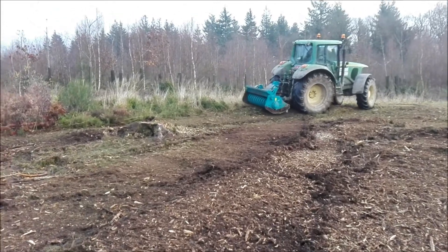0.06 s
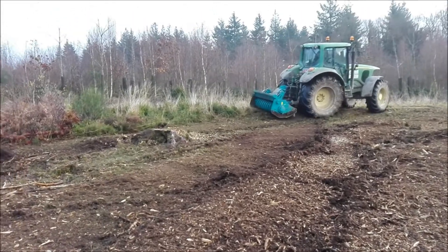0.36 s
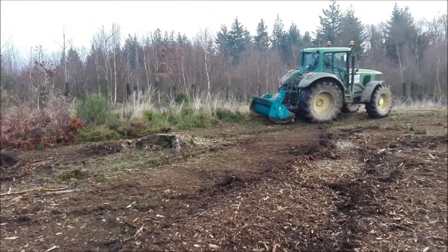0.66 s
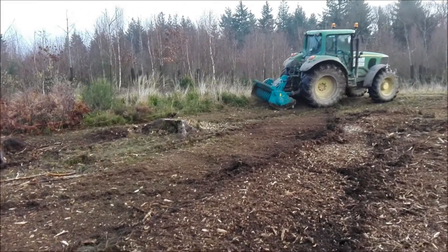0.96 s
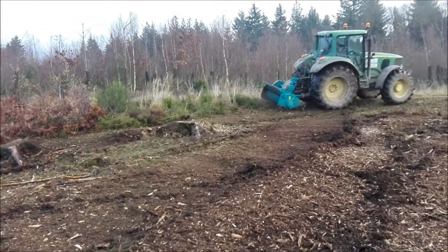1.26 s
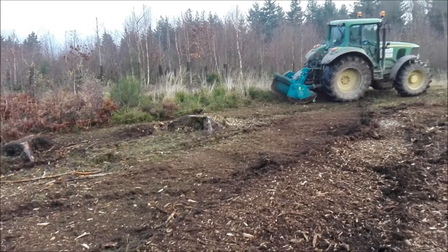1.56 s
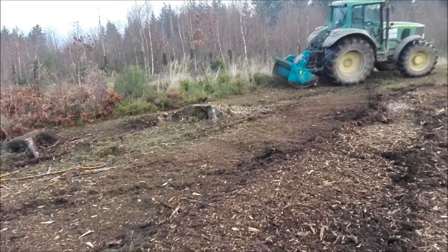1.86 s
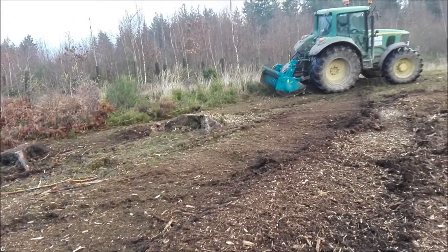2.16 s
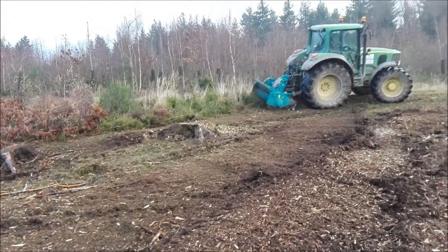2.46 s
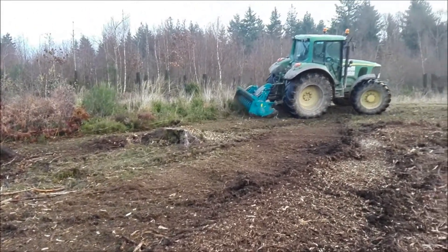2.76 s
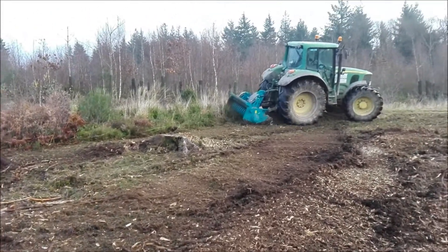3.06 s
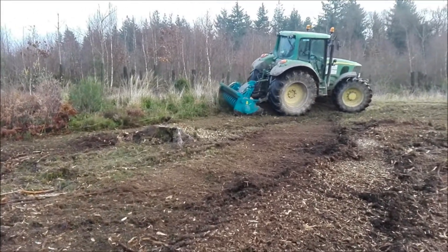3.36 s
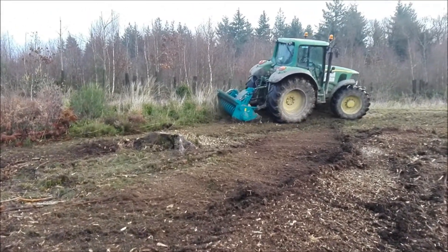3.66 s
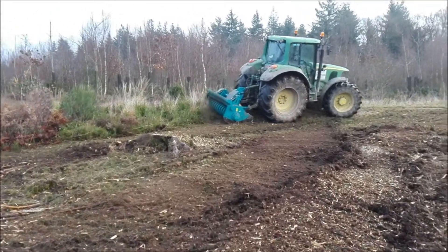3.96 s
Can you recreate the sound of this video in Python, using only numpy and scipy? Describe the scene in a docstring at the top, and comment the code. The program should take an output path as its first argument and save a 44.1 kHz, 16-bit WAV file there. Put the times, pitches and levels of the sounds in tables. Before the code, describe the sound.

A tractor driving a mulcher drones and clatters throughout, some way off in an open field. In the first second, gusts thump the microphone and dry twigs snap. From 1 second, wood is shredded, with chips rattling on steel and hard cracks. The grinding eases near 1.7 seconds and resumes at 2.5. A faint gear whine rises from 3 seconds, a stone clinks near 3.5, and two weaker gusts follow.

```python
"""A tractor drives a forestry mulcher over stumps and brush, some way off in an open field.
The drive drones and the diesel clatters throughout. Gusts thump the microphone; dry twigs snap.
From 1 s the rotor's teeth shred wood: chips rattle in the steel hood, thick pieces crack harder.
Near 2.5 s the hood turns side-on and the grinding picks up again; gear whine rises from 3 s.
Near 3.5 s a stone clinks on steel, then two weaker gusts follow."""
import sys
import numpy as np
from scipy import signal
from scipy.fft import rfft, irfft, next_fast_len
from scipy.io import wavfile
from scipy.ndimage import uniform_filter1d, map_coordinates

SR = 44100
rng = np.random.default_rng(int(sys.argv[2]) if len(sys.argv) > 2 else 0)


def materialize(psi):
    """Save the field psi as 16-bit PCM at rate SR to the path in sys.argv[1].

    A 1-D psi becomes a single channel; in a 2-D psi each row is a channel.
    """
    bounded = np.clip(np.atleast_2d(psi).T, -1, 1)
    quanta = np.round(bounded * 32767).astype(np.int16)
    wavfile.write(sys.argv[1], SR, quanta)


N = 176400

# drive speed, sagging under load (time [s], speed [Hz])
SHAFT_HZ = [(0, 78.2), (1.15, 77.6), (1.75, 75), (2.3, 79.8), (2.95, 76.3), (3.35, 76.1), (3.58, 77.5)]
# strong drone orders (time [s], order 1 [dB], order 2 [dB], order 3 [dB])
DRONE_DB = [(0, -29, -32, -36), (1.05, -27, -30, -33.5), (1.3, -36, -26, -42), (1.72, -40, -27.5, -52),
            (2.05, -30, -38.5, -44.5), (2.7, -37, -24, -45.5), (2.9, -42, -26, -36),
            (3.3, -31, -25.5, -44.5), (3.52, -34.5, -40, -46)]
# weak drone orders (order [x shaft], level [dB re order 2])
WEAK_ORDERS = [(1.3, -6.5), (4, -18.5), (4.6, -22)]
# gear tones (order [x shaft], level [dB])
GEAR_ORDERS = [(9.21, -46.5), (13.82, -41.5), (19.1, -48.5)]
# gear whine swell (time [s], gain [dB])
WHINE_GAIN_DB = [(3.0, -7), (3.55, 2)]
# machine roar (time [s], level [dB])
RUMBLE_DB = [(.3, -21.5), (.9, -24), (1.8, -29.5), (2.4, -25.5), (3.4, -26.5), (3.9, -28.5)]
# roar spectrum (frequency [Hz], gain [dB])
RUMBLE_EQ = [(25, -6), (60, -2.5), (100, 1), (135, -4.5), (190, -6.5), (270, -15.5), (480, -28),
             (900, -56.5)]
# engine casing response (frequency [Hz], gain [dB])
CASING_EQ = [(520, -17), (720, -3.5), (1050, -0.5), (1650, -1), (1900, 1), (2250, -15.5), (5000, -12.5),
             (12000, -49)]
# gusts (time [s], level [dB])
GUST_PEAKS = [(.05, -19), (.175, -16.5), (.25, -21), (.308, -17), (.42, -19), (.528, -21), (.665, -22),
              (.94, -21), (3.585, -25), (3.68, -26)]
# wind spectrum (frequency [Hz], gain [dB])
WIND_EQ = [(20, -5), (100, 2), (240, -8.5), (400, -21), (700, -50.5)]
# chip bunching per tooth pass (time [s], depth [Np])
BUNCHING_NP = [(.95, 0.34), (1.35, 0.25), (1.8, 0.44), (2.4, 0.067), (3.8, 0.31)]
# brush under the rotor (time [s], level [dB])
CRACKLE_DB = [(.45, -42), (.75, -34), (1.45, -29), (1.75, -38.5), (2.4, -41.5), (2.75, -43)]
# twigs breaking (time [s], level [dB])
TWIG_SNAPS = [(0.532, -24), (.583, -19.5), (.741, -20), (0.932, -22)]
# brush spectrum (frequency [Hz], gain [dB])
BRUSH_EQ = [(700, -17.5), (3000, 0.5), (5500, 8.5), (8000, -7)]
# grinding effort (time [s], relative level [dB])
GRIND_DB = [(.45, -36.5), (.9, -31), (1.1, -25), (1.24, -18.5), (1.35, -23), (1.5, -25.5), (1.6, -21),
            (1.73, -34.5), (2.46, -34.5), (2.58, -25), (2.85, -23), (3.1, -26.5), (3.52, -27), (3.65, -29)]
# teeth biting wood, and short chip knocks on the hood (time [s], hood level [dB], wood level [dB], T60 [s])
TOOTH_BITES = [(1.034, -24, -16, 0.08), (1.135, -10.5, -22, .12), (1.1508, -13, -15, 0.075),
               (1.164, -5.5, -12.5, 0.14), (1.2, -21, -13.5, 0.041), (1.297, -7, -17.5, 0.12),
               (1.385, -17, -22, 0.13), (1.8163, -19.5, -36, 0.027), (1.9065, -19.5, -40, .1),
               (1.9347, -23, -23, 0.036), (2.0277, -20.5, -36, 0.026), (2.0635, -16, -31, 0.052),
               (2.075, -20.5, -40, 0.13), (2.1927, -24.5, -24, .05), (2.5795, -23, -23.5, 0.057),
               (2.6944, -21.5, -15, 0.025), (2.981, -14.5, -38, 0.11), (3.2804, -21, -27, 0.087)]
# hood response from behind (frequency [Hz], gain [dB])
HOOD_REAR_EQ = [(1700, -46.5), (2600, -13), (3100, -11.5), (3950, 0.5), (5100, 0.5), (5950, -2),
                (6950, -24), (7550, -7.5), (8900, -17.5), (9900, -16), (10400, -26)]
# wood response (frequency [Hz], gain [dB])
WOOD_EQ = [(250, -14.5), (550, -25.5), (900, -8), (1400, -6.5), (1860, 2.5), (2200, -12.5), (3200, -23.5),
           (8000, -73)]
# tractor's turn (time [s], hood power heard side-on [0..1])
SIDE_SHARE = [(2.3, 0.017), (2.6, 0.97)]
# hood response from the side (frequency [Hz], gain [dB])
HOOD_SIDE_EQ = [(1700, -26), (2650, -6), (3400, -16), (3750, -2.5), (4300, -7), (5000, 0.5), (5900, -2),
                (7000, -15.5), (8300, -18), (13500, -29.5)]
# stone on steel (time [s], level [dB])
STONE_HITS = [(3.456, -12.5)]
# steel modes (frequency [Hz], relative level [dB])
STEEL_MODES = [(5141, 3.6), (5523, 3), (5798, 8)]


def amp(db):
    """Decibels to gain."""
    return 10 ** (np.asarray(db) / 20)


def unit(x):
    """Scale to rms 1."""
    return x / np.sqrt(np.mean(x ** 2) + 1e-20)


def curve(rows, column=1):
    """Table column, interpolated per sample."""
    rows = np.asarray(rows)
    return np.interp(np.arange(N) / SR, rows[:, 0], rows[:, column])


def wobble(rate_hz):
    """Smooth random curve, knots at rate_hz."""
    return map_coordinates(rng.standard_normal(4000), [np.arange(N) * rate_hz / SR], mode="wrap")


def coloured(x, eq, ripple_db=0):
    """Causal body of unit power gain, rippled by many small resonances."""
    size = 2 * next_fast_len(N)
    hz = np.fft.rfftfreq(size, 1 / SR)
    eq_hz, eq_db = np.transpose(eq)
    ripple = map_coordinates(rng.standard_normal(600), [hz / 55], mode="wrap")
    gain = amp(np.interp(np.log(hz + 1), np.log(eq_hz), eq_db) + ripple_db * ripple)
    cepstrum = irfft(np.log(unit(gain)))
    cepstrum[1:size // 2] *= 2  # fold to minimum phase
    cepstrum[size // 2 + 1:] = 0
    return irfft(rfft(x, size) * np.exp(rfft(cepstrum)), size)[:N]


def burst(start_s, t60_s, attack_s):
    """Impact envelope: fast rise, exponential decay."""
    age_s = np.maximum(np.arange(N) / SR - start_s, 0)
    return (1 - np.exp(-age_s / attack_s)) * np.exp(-np.log(1000) * np.minimum(age_s / t60_s, 10))


def drone(phase, flutter_db=0.5):
    """Low orders of the drive, each fluttering slightly."""
    orders = [(order, curve(DRONE_DB, column=order)) for order in (1, 2, 3)]
    orders += [(order, db + curve(DRONE_DB, column=2)) for order, db in WEAK_ORDERS]
    tones = np.zeros(N)
    for order, db in orders:
        peak = np.sqrt(2) * amp(db + flutter_db * wobble(13))
        tones += peak * np.sin(order * phase + rng.uniform(0, 2 * np.pi))
    return tones


def whine(phase):
    """Gear tones; they come forward once the tractor has turned."""
    tones = sum(amp(db) * np.sin(order * phase) for order, db in GEAR_ORDERS)
    return np.sqrt(2) * amp(curve(WHINE_GAIN_DB)) * tones


def rumble():
    """Dull roar of the machine."""
    return amp(curve(RUMBLE_DB)) * unit(coloured(rng.standard_normal(N), RUMBLE_EQ))


def clatter(phase, level_db=-31, depth_np=0.16):
    """Diesel knock pulsing in the engine casing."""
    knocks = unit(rng.standard_normal(N) * np.exp(depth_np * np.cos(phase)))
    return amp(level_db) * coloured(knocks, CASING_EQ, ripple_db=1)


def gusts(sigma_s=0.019):
    """Short swells of wind buffet the microphone."""
    t = np.arange(N) / SR
    swells = sum(amp(db) * np.exp(-0.5 * ((t - peak_s) / sigma_s) ** 2) for peak_s, db in GUST_PEAKS)
    return swells * coloured(rng.standard_normal(N), WIND_EQ)


def patchy(x, depth_db=2.0):
    """The colour keeps shifting as chips of different sizes fly."""
    spectra = signal.stft(x, nperseg=512)[2]
    patches = rng.standard_normal(spectra.shape)
    for _ in range(2):
        patches = uniform_filter1d(patches, size=4, axis=0)  # frequency
        patches = uniform_filter1d(patches, size=7, axis=1)  # time
    gain = unit(amp(depth_db * unit(patches)))
    return signal.istft(spectra * gain, nperseg=512)[1][:N]


def chips(phase, rate_hz, dust_gain, clump_db, spread_db=5.5):
    """Small random impacts over a hiss of dust, bunched at each tooth pass."""
    hits = (rng.random(N) < rate_hz / SR) * rng.choice([-1, 1], N)
    strengths = amp(spread_db * np.clip(rng.standard_normal(N), -2, 2))
    stream = unit(hits * strengths) + dust_gain * rng.standard_normal(N)
    tooth_passes = np.exp(curve(BUNCHING_NP) * np.cos(phase))
    clumps = amp(clump_db * wobble(260))
    return unit(patchy(stream * tooth_passes * clumps))


def brush(phase):
    """Dry twigs crackle and snap under the rotor."""
    crackle = amp(curve(CRACKLE_DB)) * chips(phase, rate_hz=1200, dust_gain=1.0, clump_db=2.5)
    snaps = sum(amp(db) * burst(start_s, t60_s=0.025, attack_s=0.00026) for start_s, db in TWIG_SNAPS)
    return coloured(crackle + snaps * rng.standard_normal(N), BRUSH_EQ)


def mulcher(phase, hood_trim_db=-1, wood_trim_db=-7.5, wood_db_per_db=1.67):
    """Chips and bites excite both the steel hood and the wood."""
    grind_db = curve(GRIND_DB)
    mean_db = grind_db.mean()
    hood_db = grind_db + hood_trim_db
    wood_db = mean_db + wood_db_per_db * (grind_db - mean_db) + wood_trim_db
    on_hood = amp(hood_db) * chips(phase, rate_hz=3500, dust_gain=1.35, clump_db=1.67)
    in_wood = amp(wood_db) * chips(phase, rate_hz=2000, dust_gain=0.65, clump_db=2.5)
    splinters = unit(rng.standard_normal(N) * amp(0.25 * wobble(500)))
    for start_s, bite_hood_db, bite_wood_db, t60_s in TOOTH_BITES:
        attack_s = t60_s ** 2 / 10  # thick pieces give way more slowly
        bite = burst(start_s, t60_s, attack_s) * splinters
        on_hood += amp(bite_hood_db) * bite
        in_wood += amp(bite_wood_db) * bite
    side_share = curve(SIDE_SHARE)
    rear = coloured(np.sqrt(1 - side_share) * on_hood, HOOD_REAR_EQ, ripple_db=1.2)
    side = coloured(np.sqrt(side_share) * on_hood, HOOD_SIDE_EQ, ripple_db=1)
    return rear + side + coloured(in_wood, WOOD_EQ, ripple_db=0.5)


def stone_clink(t60_s=0.14, jitter_rad=2.0):
    """A stone rings the steel briefly and roughly."""
    t = np.arange(N) / SR
    ring = sum(amp(db) * np.sin(2 * np.pi * hz * t + jitter_rad * wobble(400)) for hz, db in STEEL_MODES)
    envelope = sum(amp(db) * burst(start_s, t60_s, attack_s=0.00071) for start_s, db in STONE_HITS)
    return unit(ring) * envelope


def forest_echo(x, t60_s=1.0, echo_db=-13, rise_s=0.018):
    """Direct sound plus faint scatter from the forest edge."""
    t = np.arange(SR) / SR
    tail = rng.standard_normal(SR) * amp(-60 * t / t60_s) * (1 - np.exp(-t / rise_s))
    return x + amp(echo_db) * signal.fftconvolve(x, tail / np.linalg.norm(tail))[:N]


def scene():
    """Mono mix; one shaft speed drives drone, whine, clatter and teeth."""
    shaft_hz = curve(SHAFT_HZ) + wobble(9.98) / 20
    phase = 2 * np.pi * np.cumsum(shaft_hz) / SR
    shredding = mulcher(phase) + brush(phase) + stone_clink()
    mix = drone(phase) + whine(phase) + rumble() + gusts() + clatter(phase) + forest_echo(shredding)
    return mix[None]


def record(dry, cutoff_hz=14400):
    """Clip at full scale, then band-limit."""
    size = next_fast_len(N + SR // 2)
    passband = np.fft.rfftfreq(size, 1 / SR) < cutoff_hz
    return irfft(rfft(np.clip(dry, -1, 1), size) * passband, size)[:, :N]


dry = scene()
out = record(dry)
materialize(out)
```